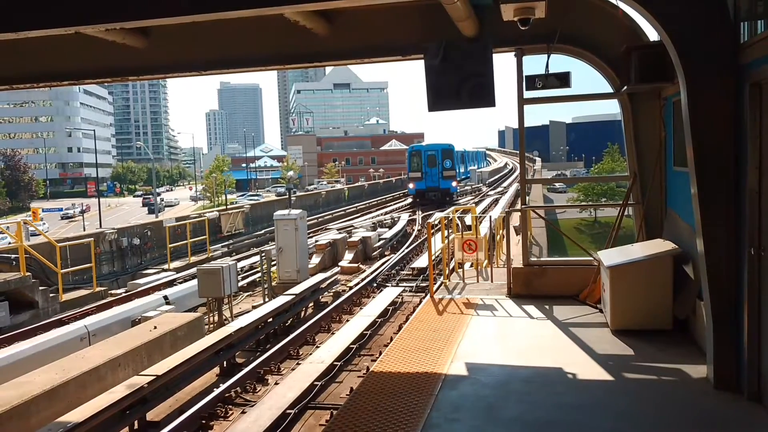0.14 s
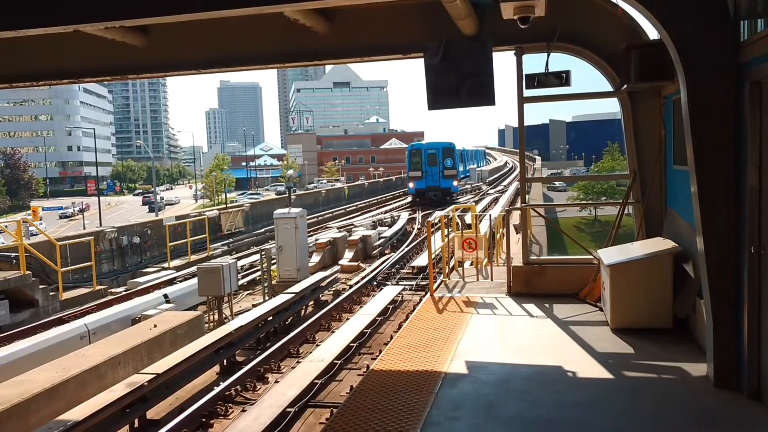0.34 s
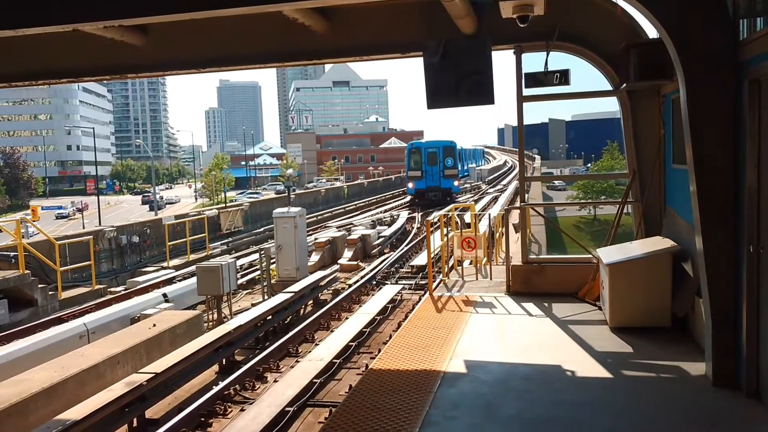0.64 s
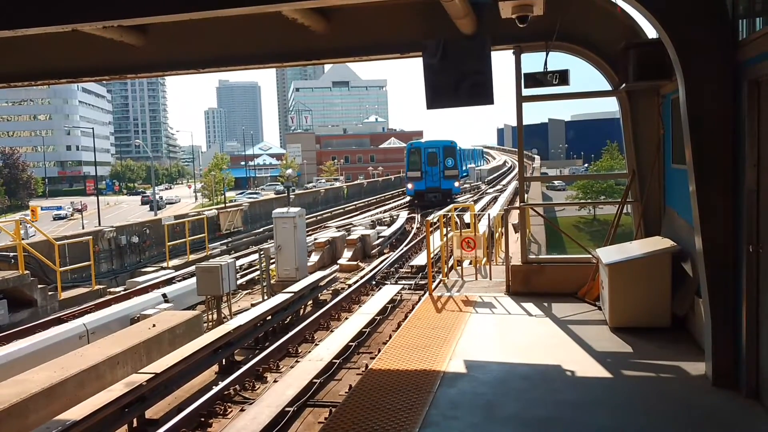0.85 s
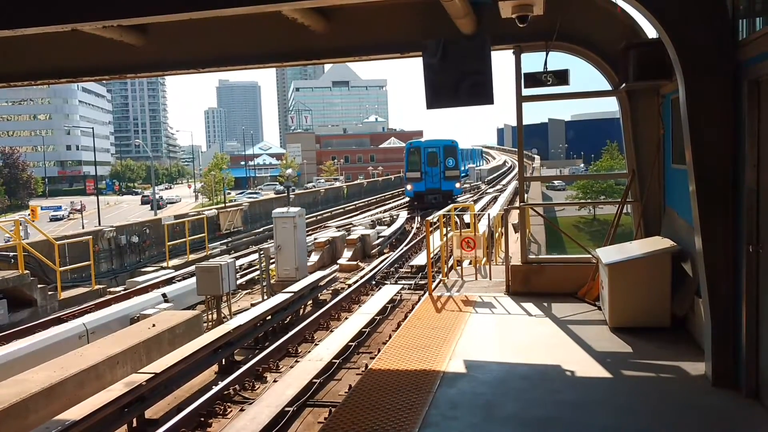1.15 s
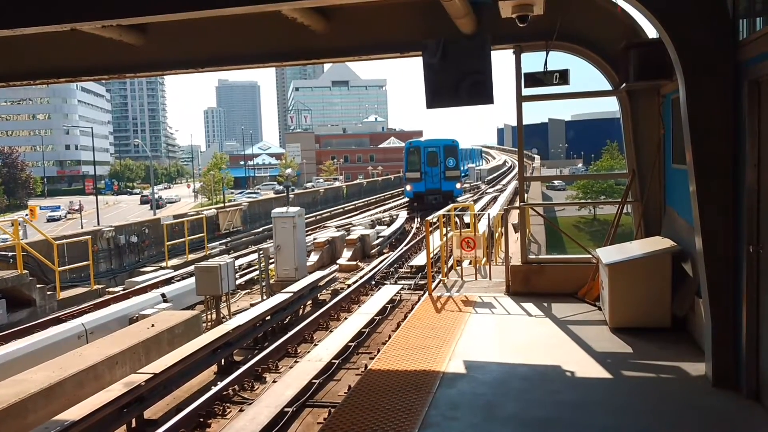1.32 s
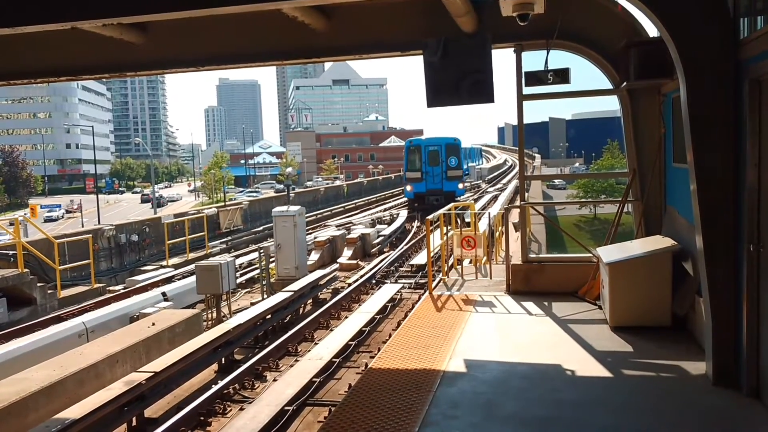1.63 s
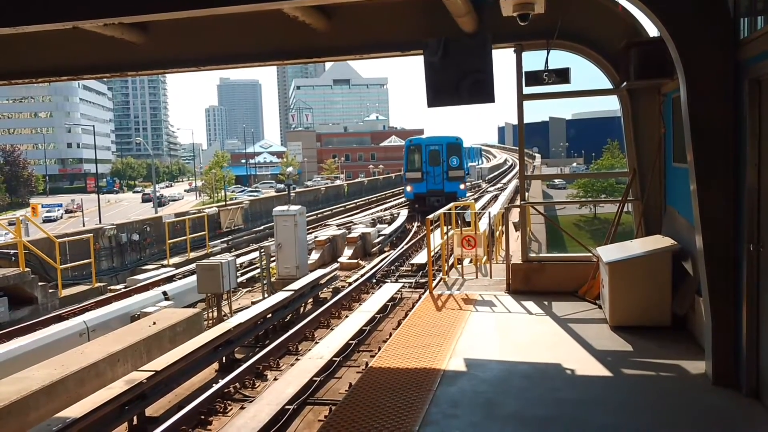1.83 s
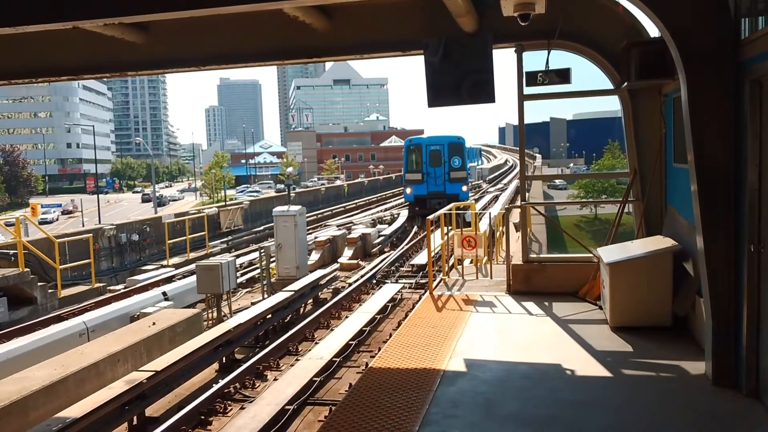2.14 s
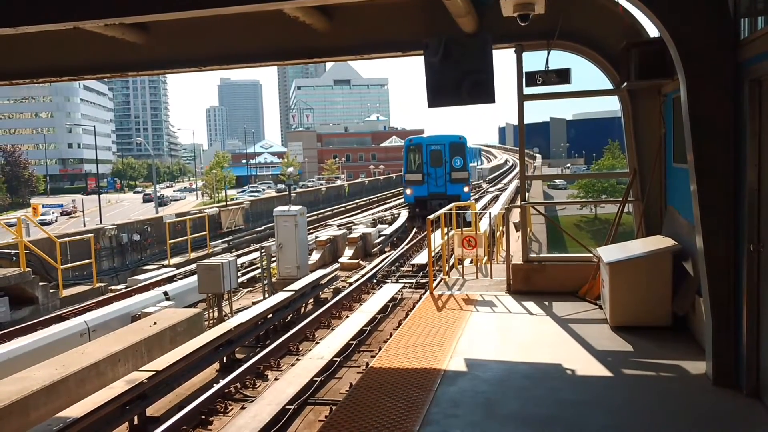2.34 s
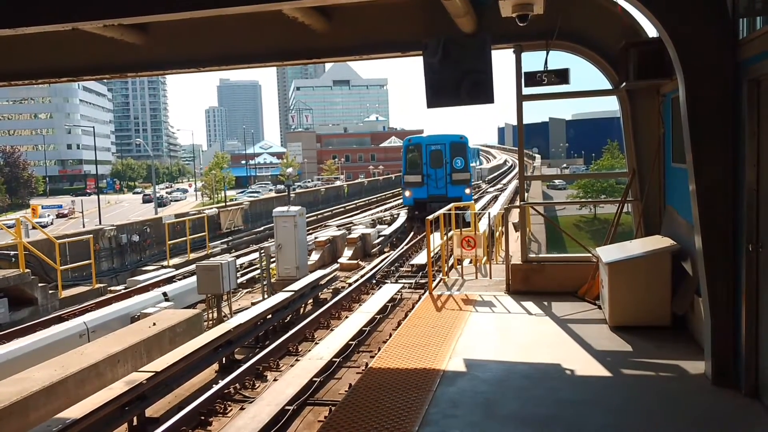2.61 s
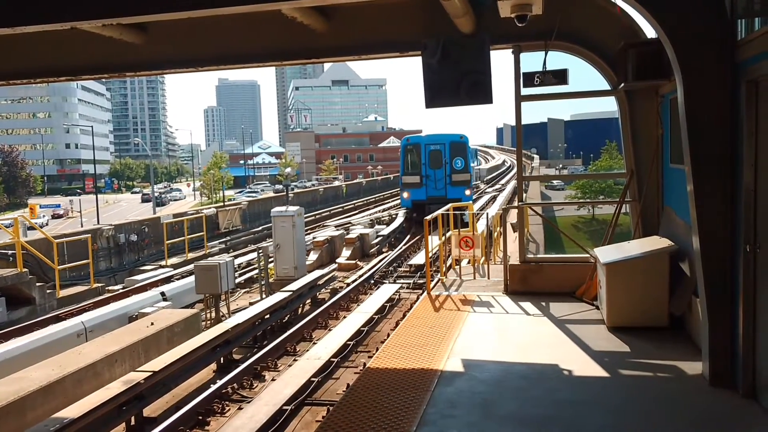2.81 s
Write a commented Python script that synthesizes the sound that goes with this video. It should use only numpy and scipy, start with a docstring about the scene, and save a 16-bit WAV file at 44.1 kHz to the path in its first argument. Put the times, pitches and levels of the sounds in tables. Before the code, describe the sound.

A light train approaches an elevated outdoor platform. Shrill wavering wheel squeal and scrape come first and die away quickly, then rolling rumble, hiss and irregular rail-joint knocks grow louder, heard in stereo from under the roof.

```python
"""Light train nearing a platform

A light train nears an elevated platform. Its wheels squeal on the bend: wavering tones over a noisy scrape.
They roll on with boom, rumble, roar, hiss and ringing rails, all made of coloured noise; tiny ticks add grit.
Rail joints knock: short swells of noise that ring the track. A low sine tone is the hum of the city.
Two microphone ports hear a blend of direct and scattered sound, the right one a little before the left."""
import sys
import numpy as np
from scipy import signal
from scipy.fft import rfft, irfft
from scipy.io import wavfile
from scipy.ndimage import uniform_filter1d

SR = 44100
rng = np.random.default_rng(int(sys.argv[2]) if len(sys.argv) > 2 else 0)


def master(y):
    """Save y as 16-bit WAV."""
    cut = np.clip(np.atleast_2d(y).T, -1, 1)
    pcm = np.round(cut * 32767)  # scale
    wavfile.write(sys.argv[1], SR, pcm.astype(np.int16))


N = 130977  # length in samples

# Loudness of the rolling layers as the train comes nearer: [t/s, level/dB]
BOOM_LEVEL = [(0, -53), (.3, -62), (.72, -51), (.95, -47), (1.5, -44), (2.24, -46), (2.97, -38.5)]
RUMBLE_LEVEL = [(0.0, -35.5), (0.15, -41), (.45, -37), (0.52, -29.5), (0.64, -36), (.83, -34.5),
                (0.99, -28), (1.12, -31), (1.5, -28.5), (1.99, -29), (2.17, -35), (2.21, -26.5),
                (2.24, -33), (2.33, -28), (2.4, -32.5), (2.47, -27.5), (2.94, -30), (2.97, -37)]
ROAR_LEVEL = [(0.0, -35), (.15, -37.5), (.3, -33), (.44, -37.5), (0.62, -37), (1.01, -30), (1.1, -29.5),
              (1.56, -29), (1.9, -29), (2.27, -30), (2.56, -25.5), (2.71, -27), (2.86, -25.5),
              (2.97, -33.5)]
RAIL_LEVEL = [(0, -45), (.7, -38), (1.2, -37), (2.97, -33.5)]
HISS_LEVEL = [(0, -29.5), (.06, -38.5), (.22, -27.5), (.25, -27.5), (.33, -38), (.44, -36.5), (.6, -34),
              (.69, -39), (.74, -35), (.94, -35), (1.03, -26), (1.1, -34.5), (1.16, -34.5), (1.22, -30.5),
              (1.35, -31), (1.55, -28.5), (1.68, -33.5), (1.76, -28.5), (1.85, -32.5), (1.92, -30.5),
              (1.95, -27), (2.0, -26), (2.12, -34.5), (2.2, -32), (2.29, -35), (2.35, -28.5), (2.7, -28.5),
              (2.76, -31.5), (2.81, -24), (2.87, -30), (2.97, -31.5)]
# Colour of the rolling layers, only relative: [f/Hz, level/dB]
BOOM_COLOUR = [(15, -32), (30, -14), (50, 0), (65, -3), (85, 0), (105, -3), (140, -30)]
RUMBLE_COLOUR = [(60, -12), (100, -7), (130, -4), (150, -2.5), (185, -0.5), (280, 1), (380, -7.5),
                 (500, -11), (900, -75)]
ROAR_COLOUR = [(200, -10.5), (400, -3), (700, 1), (1000, -4.5), (1250, -4.5), (1550, -5.5), (1900, -2.5),
               (2150, -1), (2400, -10.5), (2650, 1.5), (3000, -5.5), (3500, -22), (5000, -63)]
HISS_COLOUR = [(1500, -40), (3000, -3), (3600, -6), (4300, -8), (5000, -3.5), (6000, -3), (7200, -0.5),
               (8500, -3), (9700, -10), (11000, -14), (12500, -36), (14300, -44), (15000, -61)]
# Resonances of the ringing rails: [f/Hz, width/Hz, level/dB]
RAIL_PEAKS = [(271, 31, -4.5), (336, 58, -4.5), (413, 25, 2), (574.7, 42, 1), (700, 15, -15), (893, 65, -2),
              (1191, 75, -6.5), (1803, 68, -6.5), (2277, 120, -2.5)]
# Small wheel impacts: how many, how uneven, and their level against the roar
GRIT_PER_S, GRIT_SPREAD_DB, GRIT_DB = 1500, 3.5, -7

# Frequencies of the wheel modes: [f/Hz]
WHEEL_HZ = [2505, 2686, 4126, 4175, 4257, 4590, 4647, 5880, 5955, 6465, 7014, 7133, 7340, 7547, 7625, 8323,
            8640, 8741, 8855, 8894, 9044, 9168, 9238, 9840, 10225, 10480, 10691, 10988, 11117, 11956, 12260,
            12500, 13254, 14128, 14180]
# One row per wheel mode: [width of its wavering/Hz, t60/s, then its level/dB in each burst of squeal]
WHEEL_MODES = [(30.2, 0.25, -39, -66, -15.5, -18, -41, -66, -35, -33, -43),
               (30, 0.15, -66, -55, -50, -39, -38.5, -37, -47, -49, -43),
               (30, 1, -52, -66, -50, -40, -37, -44, -44, -46, -58),
               (30.6, 0.72, -41.5, -66, -34.5, -29, -39, -66, -32, -36.5, -55),
               (30, 0.27, -54, -65, -36, -47, -38, -66, -39, -46, -57),
               (30, 0.17, -35, -66, -60, -66, -66, -66, -60, -62, -59),
               (30, 0.13, -44, -66, -64, -52, -46, -66, -53, -50, -60),
               (30.2, 0.16, -37, -40, -34, -33.5, -35, -36, -45, -54, -51),
               (30.2, 0.2, -58, -47, -37, -51, -19, -66, -40, -63, -66),
               (30, 0.45, -46, -66, -66, -57, -51, -59, -54, -66, -46),
               (30, 0.2, -66, -66, -50, -66, -66, -59, -66, -66, -57),
               (30, 1.5, -66, -66, -66, -66, -66, -66, -50, -53, -43),
               (30, 0.7, -32.5, -66, -66, -48, -51, -66, -58, -54, -66),
               (30, 0.3, -44, -32, -47, -29.5, -37, -66, -47, -61, -33),
               (30, 0.16, -51, -38, -41, -44, -43, -30, -45, -66, -36),
               (30, 0.81, -45, -39, -66, -47, -66, -37, -66, -50, -66),
               (30, 1.1, -36, -66, -66, -66, -66, -66, -41, -45, -48),
               (30, 0.33, -36.5, -25, -39, -41, -66, -66, -59, -50, -35),
               (30, 0.2, -38, -51, -37, -31, -40, -33.5, -49, -66, -69),
               (30, 0.2, -43, -59, -44, -33, -40, -66, -48, -66, -66),
               (30, 0.2, -66, -66, -57, -56, -50, -61, -66, -66, -60),
               (30, 0.98, -48, -49, -36, -64, -38, -66, -50, -66, -63),
               (30, 0.22, -53, -54, -49, -50, -39, -66, -45, -64, -66),
               (30, 0.2, -54, -54, -50, -42, -57, -64, -56, -66, -50),
               (30, 0.63, -52, -44, -50, -66, -66, -51, -62, -66, -51),
               (30, 0.25, -34, -29, -44, -44, -43, -50, -56, -66, -56),
               (30, 0.45, -60, -55, -48, -57, -41, -66, -66, -66, -52),
               (30, 0.37, -49, -65, -58, -55, -31.5, -66, -45, -51, -41),
               (30, 0.3, -60, -55, -66, -58, -49, -66, -54, -66, -66),
               (30, 0.28, -52, -66, -45, -48, -46, -50, -56, -65, -38),
               (30, 0.2, -47, -41, -54, -55, -47, -52, -56, -66, -59),
               (30, 1, -66, -66, -66, -66, -64, -60, -50, -62, -66),
               (30, 0.22, -66, -66, -66, -66, -43, -66, -48, -66, -66),
               (30, 0.3, -38, -29, -66, -51, -66, -60, -64, -66, -66),
               (30, 0.59, -23, -36, -66, -61, -64, -66, -64, -66, -68)]
# Bursts of squeal: [peak t/s, rise over the last 20 dB/s, hold/s]
SQUEALS = [(0, .02, .02), (0.064, .02, .012), (0.137, 0.027, 0.024), (0.188, .04, 0.016),
           (0.244, .025, 0.0071), (0.279, .02, .01), (0.347, .025, .015), (0.49, 0.018, 0.017),
           (2.92, .078, 0.042)]
SQUEAL_ROUGH = 0.55  # share of the tone's power that wavers; the rest is pure
# Colour of the flange scrape, only relative: [f/Hz, level/dB]
SCRAPE_COLOUR = [(2000, 2), (4000, -5), (8000, -11), (10500, 11.5), (12300, -21), (13000, -30),
                 (15000, -40)]
SCRAPE_DB, SCRAPE_END_S, SCRAPE_FADE_DB_PER_S = -35, 0.32, 72

# Wheels over rail joints: [t/s, broad blow level/dB, low ring level/dB, high ring level/dB, t60/s]
KNOCKS = [(0.479, -31, -30, -33, 0.28), (0.68, -40, -35.5, -51, 0.64), (0.753, -28, -27.5, -39, 0.21),
          (.90, -31, -34, -43, 0.38), (1.016, -23.5, -36, -34, 0.23), (1.183, -29, -24, -27, 0.18),
          (1.40, -31, -35, -28, 1), (1.489, -23.5, -30.5, -25, 0.35), (1.53, -28, -45, -29, 0.23),
          (1.731, -26.5, -31, -30, 0.4), (1.92, -23, -30, -20.5, 0.33), (1.975, -28, -41, -37, 0.53),
          (2.189, -27, -24, -27, 0.23), (2.308, -23, -25, -24, 0.37), (2.43, -31, -44, -25, 0.57),
          (2.51, -35, -34, -44, 0.41), (2.638, -32, -24, -26, 0.32), (2.70, -46, -33, -52, 0.83),
          (2.758, -26, -26, -25, 0.42)]
KNOCK_RISE_S = 0.011
# Colour of the broad blow, only relative: [f/Hz, level/dB]
BLOW_COLOUR = [(60, -30), (200, -17), (500, -8.5), (1500, -3), (3000, -6.5), (7000, -22), (12000, -41)]
# Resonances of the track, the first two are the low ring: [f/Hz, width/Hz, level/dB]
TRACK_PEAKS = [(632, 93, -1), (780, 144, 0), (1233, 140, 6.5), (1610, 40, 4), (1850, 125, 6.5),
               (2230, 600, 2)]

HUM_HZ = 150.2
# Loudness of the hum: [t/s, level/dB]
HUM_LEVEL = [(0, -45.5), (.2, -54), (.28, -40), (.5, -41), (.8, -37.5), (.92, -46), (1.2, -56), (3, -45)]
# Phase of the hum's scattered part as its source drifts to the front: [t/s, phase/rad]
HUM_TURN = [(0, -2.5), (.4, -4), (.6, 1.5), (3, 0)]

CANOPY_DB, CANOPY_WIDTH_HZ = 1.2, 18  # depth and smoothing width of the roof's ripple
LEAD_S = 0.000394  # head start of the right port
# Phase of the right port in the bass: [f/Hz, phase/rad]
BASS_TURN = [(30, -2.9), (70, -2.4), (120, -1.3), (300, -.45), (800, -.2), (1250, 0)]
# Likeness of the two ports, 1 is the same sound: [f/Hz, likeness]
BASS_SAME = [(25, .97), (60, .9), (100, .75)]
SAME = [(170, 0.8), (400, 0.47), (700, 0.78), (1300, 1), (2000, 0.99), (2500, 1), (3100, 0.89),
        (3700, 0.98), (4300, 1), (5000, 1), (5600, 0.4), (7000, 0.78), (10000, 1), (14000, 0.79)]
# Right port over left port: [f/Hz, level/dB]
RIGHT_OVER_LEFT = [(25, 1), (60, 2), (150, -4), (350, 3), (1000, 0.5), (3500, 0.5), (4500, 1), (7000, 4),
                   (9000, 2), (10500, 0)]
EDGE_HZ = 14700  # upper band limit


def rolling():
    """Steel on steel: boom, rumble of the guideway, roar of rail and wheel, ringing rails, contact hiss."""
    boom = noise(points_colour(BOOM_COLOUR), patchy_db=-4, flicker_db=3)
    rumble = noise(points_colour(RUMBLE_COLOUR), patchy_db=0, flicker_db=-1)
    roar = noise(points_colour(ROAR_COLOUR), patchy_db=2, flicker_db=0) + grit()
    rails = noise(lambda hz: rings(hz, RAIL_PEAKS), patchy_db=2, flicker_db=0)
    hiss = noise(points_colour(HISS_COLOUR), patchy_db=1.5, flicker_db=1)
    return (curve(BOOM_LEVEL) * boom + curve(RUMBLE_LEVEL) * rumble + curve(ROAR_LEVEL) * roar
            + curve(RAIL_LEVEL) * rails + curve(HISS_LEVEL) * hiss)


def grit():
    """Rough spots on the wheels tick densely, coloured like the roar."""
    hits = rng.random((2, N)) < GRIT_PER_S / SR
    signs = rng.choice([-1, 1], (2, N))
    strengths = amp(GRIT_SPREAD_DB * rng.exponential(1, (2, N)))
    colour = amp(read(ROAR_COLOUR, np.fft.rfftfreq(N, 1 / SR)))
    return amp(GRIT_DB) * evened(irfft(rfft(hits * signs * strengths) * colour, N))


def squeal():
    """Slipping wheels sing on their modes, unsteadily, over the scrape of the flange."""
    t = np.arange(N) / SR
    coarse = t[::16]  # the tones change slowly, so every 16th sample is enough
    tones = np.zeros((2, N))
    for hz, (width_hz, t60, *levels_db) in zip(WHEEL_HZ, WHEEL_MODES):
        power = np.zeros(len(coarse))
        for db, (peak, rise, hold) in zip(levels_db, SQUEALS):
            rise_db = 20 * np.maximum(peak - coarse, 0) / rise
            decay_db = 60 * np.maximum(coarse - peak - hold, 0) / t60
            power += amp(db - rise_db - decay_db) ** 2
        wobble = wavering(width_hz, len(coarse))
        shape = [np.interp(t, coarse, row) for row in np.sqrt(2 * power) * wobble]
        tones += (shape * np.exp(2j * np.pi * hz * t)).real
    fade = amp(SCRAPE_DB - SCRAPE_FADE_DB_PER_S * np.maximum(t - SCRAPE_END_S, 0))
    return tones + fade * noise(points_colour(SCRAPE_COLOUR), patchy_db=3, flicker_db=1.5)


def wavering(width_hz, length):
    """A tone's slow random change of strength and phase, mixed with a steady part."""
    a, b = rng.standard_normal((2, 2, length + 400))
    pole = np.exp(-np.pi * 16 * width_hz / SR)
    # smooth twice, then drop the first 400 points where the filter settles
    drift = signal.lfilter([1], np.convolve([1, -pole], [1, -pole]), a + 1j * b)[:, 400:]
    drift = drift / np.sqrt(np.mean(abs(drift) ** 2))
    steady = np.exp(2j * np.pi * rng.random((2, 1)))
    return np.sqrt(SQUEAL_ROUGH) * drift + np.sqrt(1 - SQUEAL_ROUGH) * steady


def knocks():
    """Distant blows, smeared into short swells that ring the track's resonances."""
    t = np.arange(N) / SR
    power = np.zeros((3, N))
    for start, *parts_db, t60 in KNOCKS:
        since = np.maximum(t - start, 0)
        rise = np.minimum(since / KNOCK_RISE_S, 1)
        power += (rise * amp(np.array(parts_db)[:, None] - 60 * since / t60)) ** 2
    blow, low, high = np.sqrt(power)
    return (blow * noise(points_colour(BLOW_COLOUR), patchy_db=3, flicker_db=1.5)
            + low * noise(lambda hz: rings(hz, TRACK_PEAKS[:2]), patchy_db=0, flicker_db=-2)
            + high * noise(lambda hz: rings(hz, TRACK_PEAKS[2:]), patchy_db=1, flicker_db=0))


def hum():
    """A low tone of steady pitch from the street below, drifting across."""
    t = np.arange(N) / SR
    turn = np.interp(t, *np.transpose(HUM_TURN))
    phases = np.array([0 * t, turn])  # direct part, scattered part
    return np.sqrt(2) * curve(HUM_LEVEL) * np.sin(2 * np.pi * HUM_HZ * t + phases)


def canopy(hz):
    """Reflections under the roof ripple the spectrum finely."""
    span = max(int(CANOPY_WIDTH_HZ / hz[1]), 1)
    ripple = uniform_filter1d(rng.standard_normal(len(hz)), size=span)
    ripple = uniform_filter1d(ripple, size=span)
    return amp(CANOPY_DB * evened(ripple))


def noise(colour, patchy_db, flicker_db):
    """Two unrelated noises of one colour (direct, scattered), sharing drifting patches and flicker."""
    frames = N // 128 + 5
    a, b, c, d, patches = rng.standard_normal((frames, 257, 5)).T
    flicker = evened(uniform_filter1d(patches.mean(0), size=8))  # all pitches together
    patches = uniform_filter1d(patches, size=5, axis=0)  # smooth over frequency
    patches = evened(uniform_filter1d(patches, size=20, axis=1))  # smooth over time
    spectra = np.array([a + 1j * b, c + 1j * d]) * amp(patchy_db * patches + flicker_db * flicker)
    x = signal.istft(spectra, nperseg=512, noverlap=384)[1][:, :N]
    return evened(irfft(rfft(x) * colour(np.fft.rfftfreq(N, 1 / SR)), N))


def rings(hz, peaks):
    """Gain of a set of resonances, each halved at half its width from the centre."""
    power = sum(amp(db) ** 2 / (1 + (2 * (hz - f) / width) ** 2) ** 2 for f, width, db in peaks)
    return np.sqrt(power)


def points_colour(points):
    """Turn a colour table into a gain for any frequency."""
    return lambda hz: amp(read(points, hz))


def read(points, hz):
    """Read a table between its points, along a logarithmic frequency axis."""
    f, value = np.transpose(points)
    return np.interp(np.log(hz + 1), np.log(f + 1), value)


def curve(points):
    """Turn a level table into a gain for every sample."""
    s, db = np.transpose(points)
    return amp(np.interp(np.arange(N) / SR, s, db))


def amp(db):
    """Decibels to an amplitude factor."""
    return 10 ** (np.asarray(db) / 20)


def evened(x):
    """Scale to an RMS of one."""
    return x / np.sqrt(np.mean(x ** 2) + 1e-20)


def scene():
    """Direct and scattered sound blended at two ports; the right one hears first."""
    size = N + 8192  # spare room for the spectral filters
    hz = np.fft.rfftfreq(size, 1 / SR)
    under_roof = canopy(hz) * rfft(rolling() + knocks(), size)
    direct, scattered = under_roof + rfft(squeal() + hum(), size)
    same = np.clip(read(BASS_SAME + SAME, hz), 0, 1)
    # the head start, with half a turn taken off, takes over where it exceeds the bass phase
    turn = np.maximum(2 * np.pi * hz * LEAD_S - np.pi, read(BASS_TURN, hz))
    right = same * direct * np.exp(1j * turn) + np.sqrt(1 - same ** 2) * scattered
    tilt = amp(read(RIGHT_OVER_LEFT, hz) / 2)  # half of the difference goes to each port
    return irfft(np.array([direct / tilt, right * tilt]), size)[:, :N]


def record(dry):
    """The band limit of the recorder: a steep low-pass filter."""
    low_pass = signal.firwin(511, EDGE_HZ, window=("kaiser", 9), fs=SR)
    return signal.oaconvolve(dry, low_pass[None], "same")


dry = scene()
out = record(dry)
master(out)
```